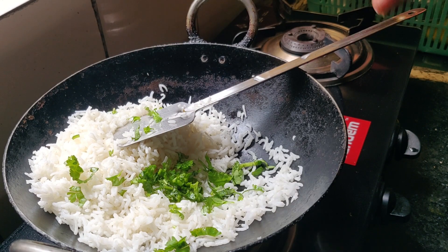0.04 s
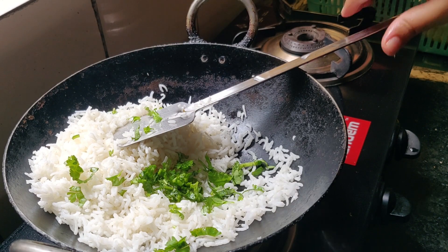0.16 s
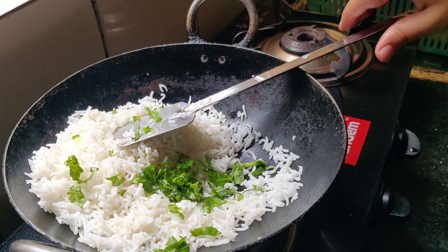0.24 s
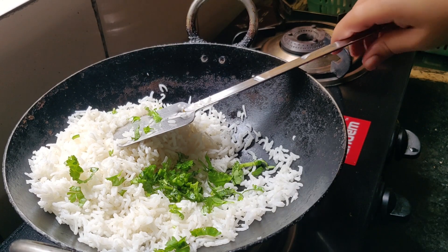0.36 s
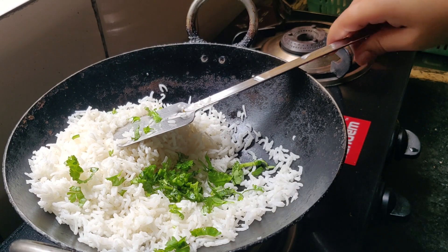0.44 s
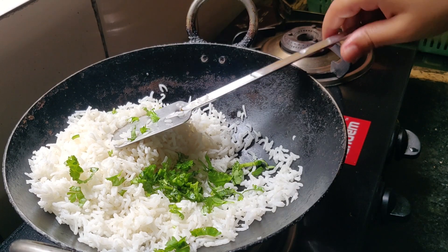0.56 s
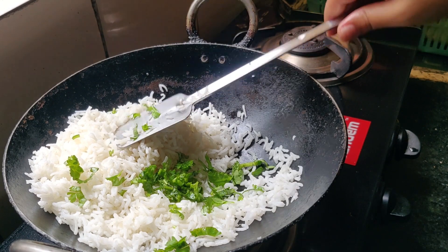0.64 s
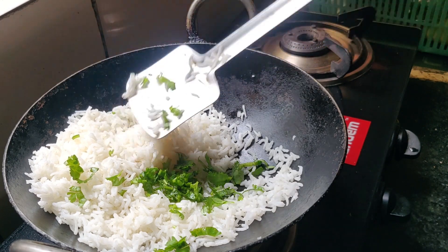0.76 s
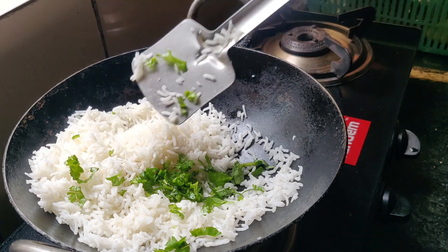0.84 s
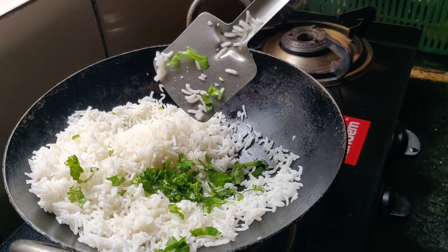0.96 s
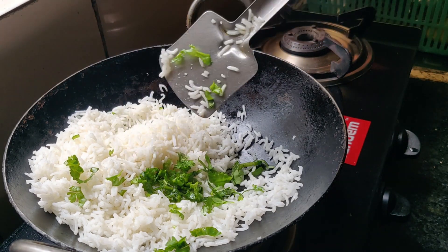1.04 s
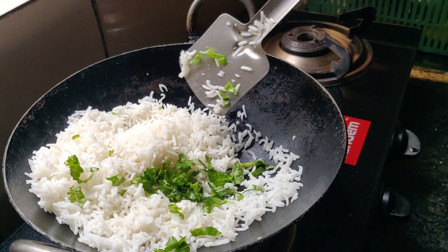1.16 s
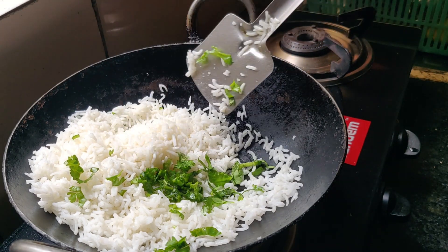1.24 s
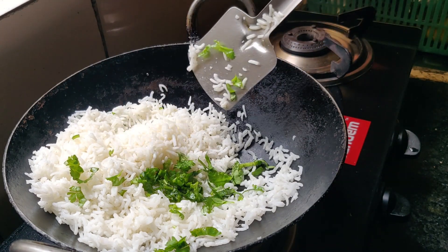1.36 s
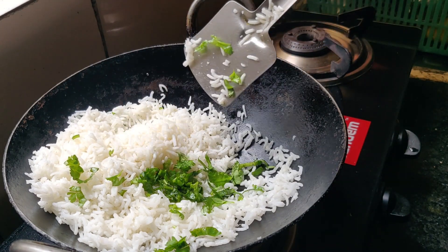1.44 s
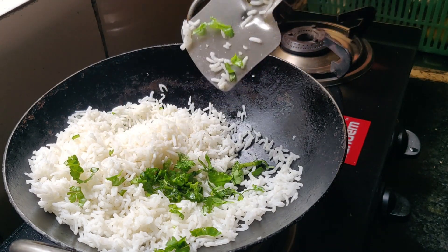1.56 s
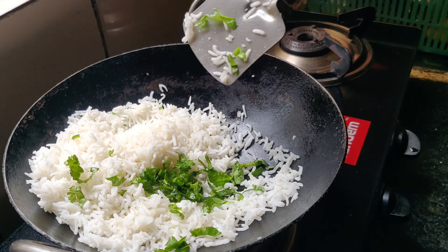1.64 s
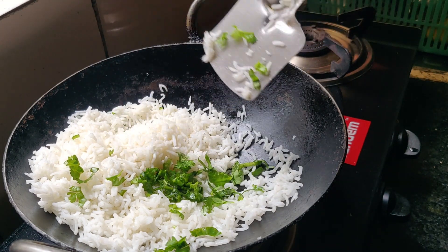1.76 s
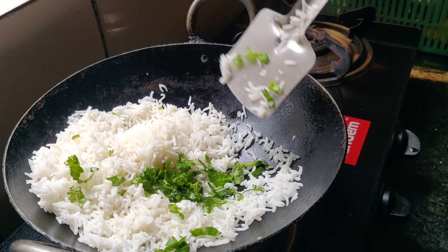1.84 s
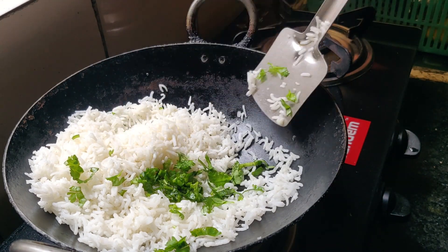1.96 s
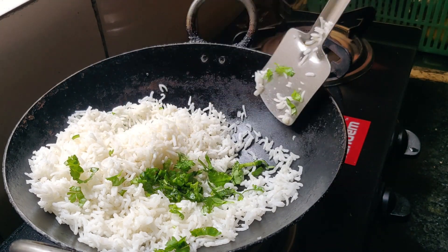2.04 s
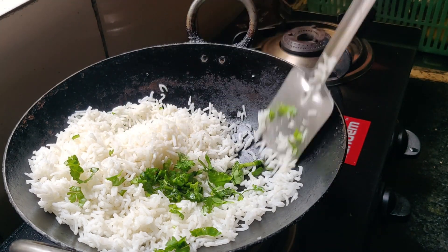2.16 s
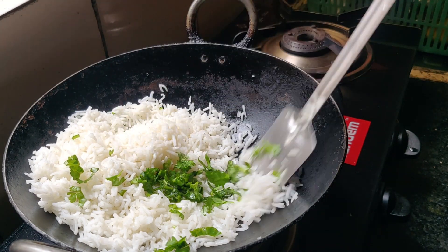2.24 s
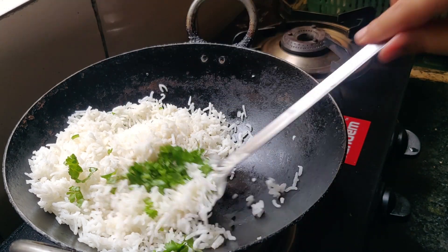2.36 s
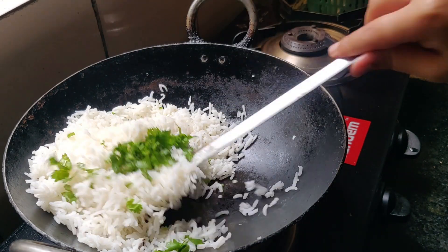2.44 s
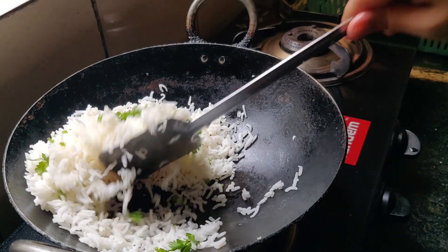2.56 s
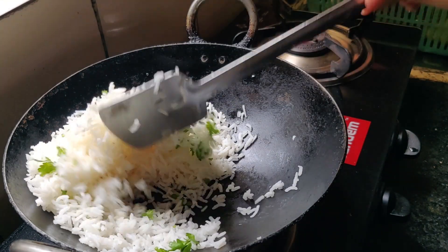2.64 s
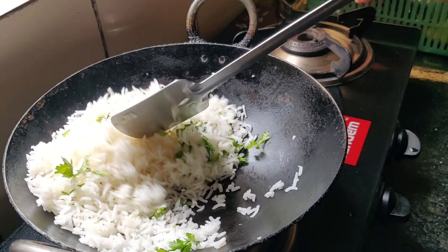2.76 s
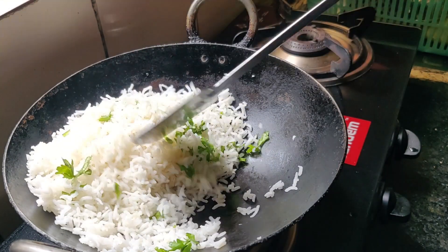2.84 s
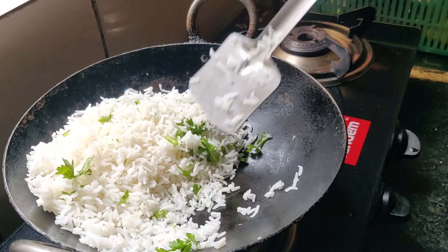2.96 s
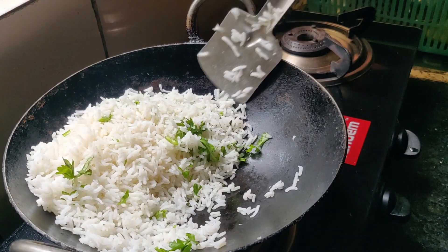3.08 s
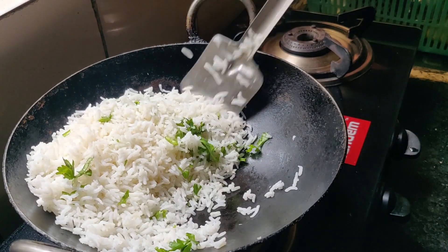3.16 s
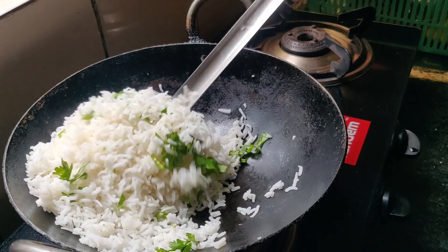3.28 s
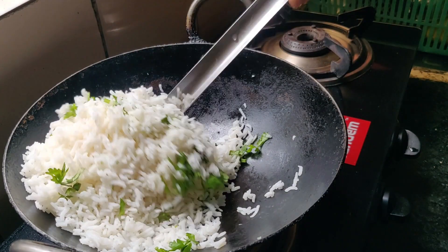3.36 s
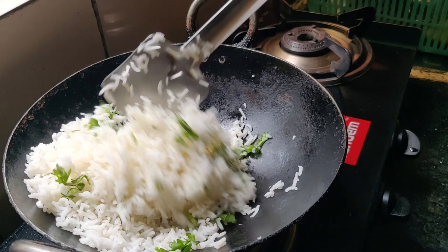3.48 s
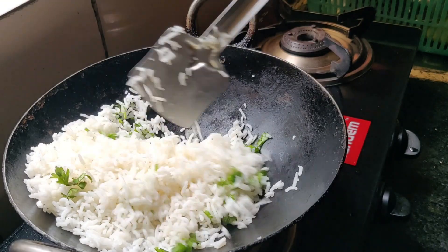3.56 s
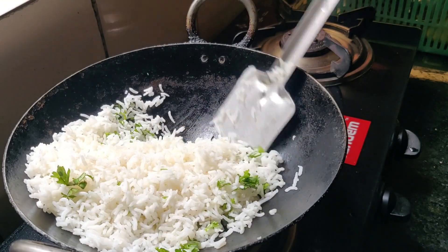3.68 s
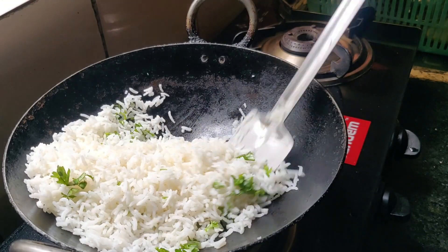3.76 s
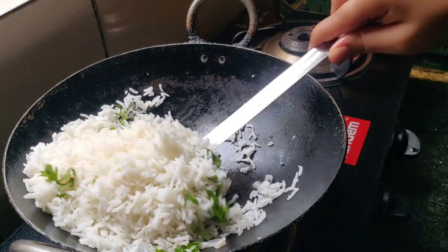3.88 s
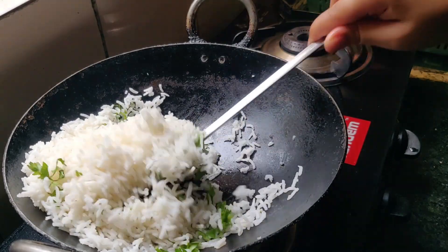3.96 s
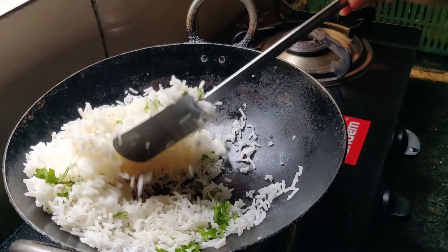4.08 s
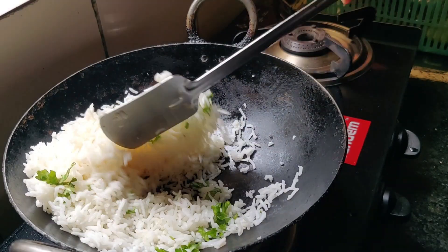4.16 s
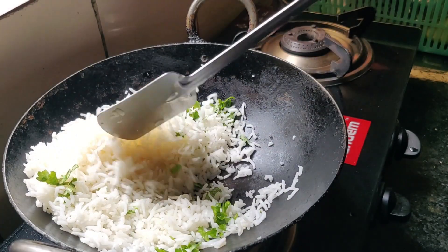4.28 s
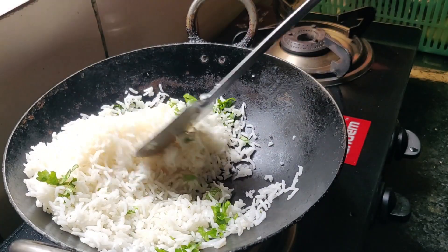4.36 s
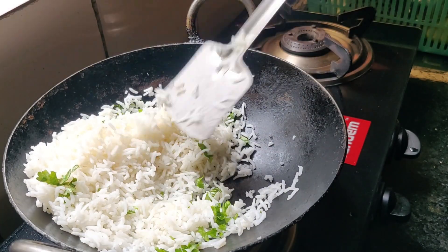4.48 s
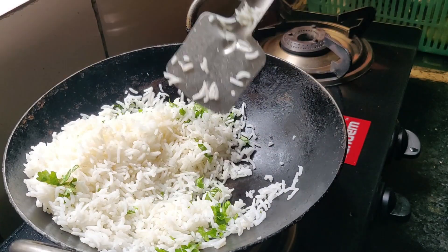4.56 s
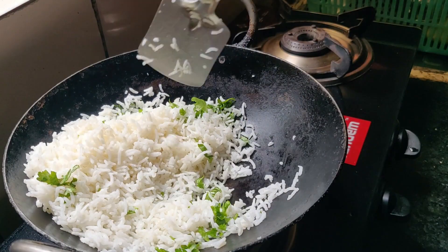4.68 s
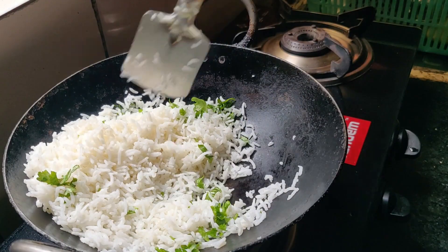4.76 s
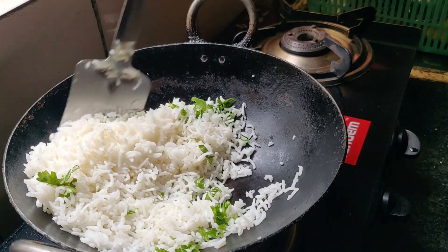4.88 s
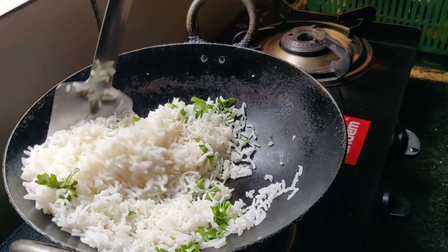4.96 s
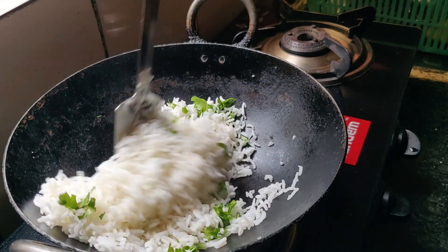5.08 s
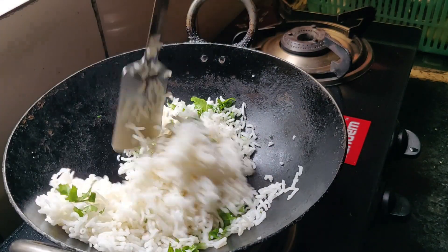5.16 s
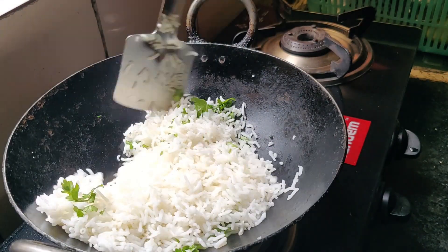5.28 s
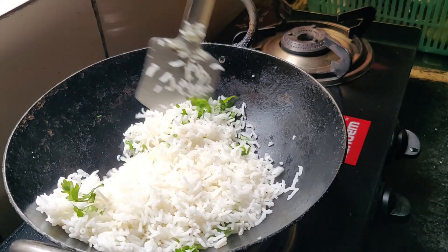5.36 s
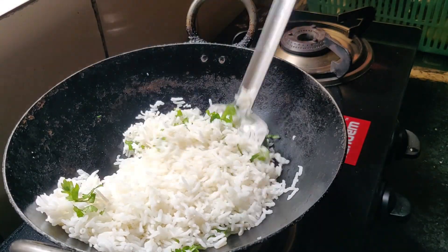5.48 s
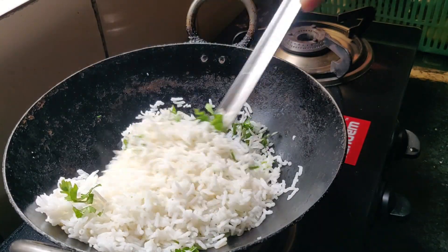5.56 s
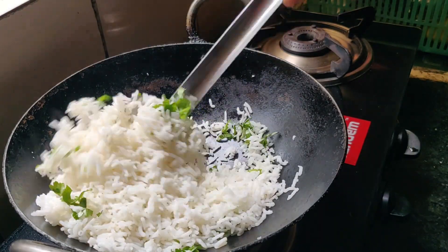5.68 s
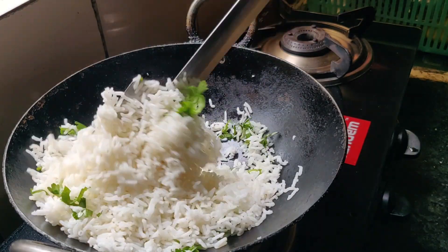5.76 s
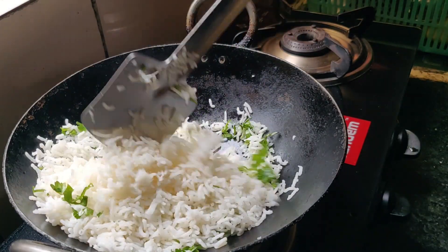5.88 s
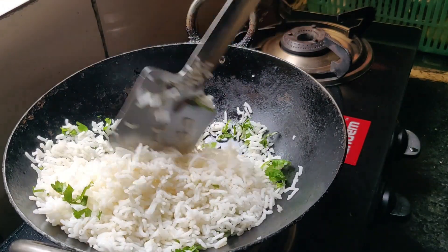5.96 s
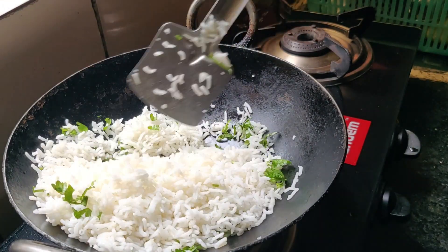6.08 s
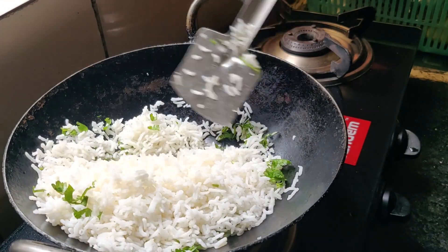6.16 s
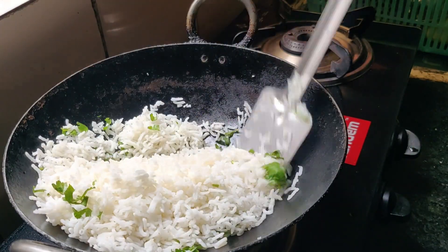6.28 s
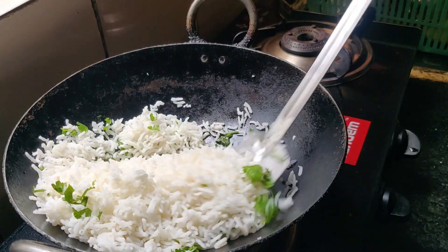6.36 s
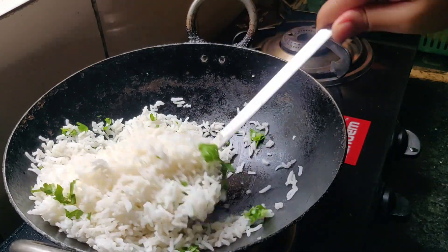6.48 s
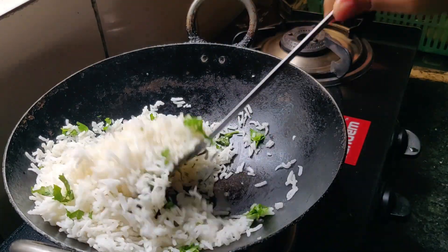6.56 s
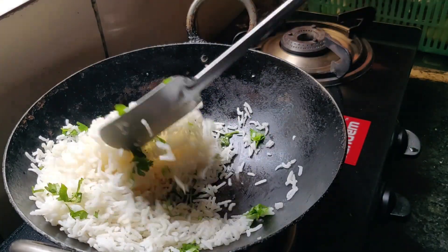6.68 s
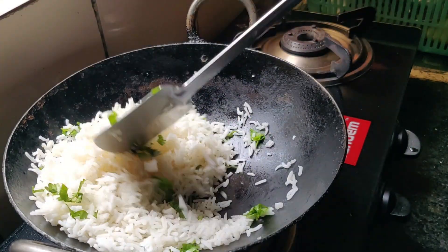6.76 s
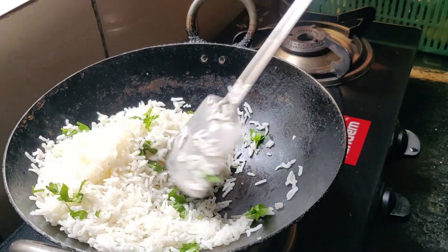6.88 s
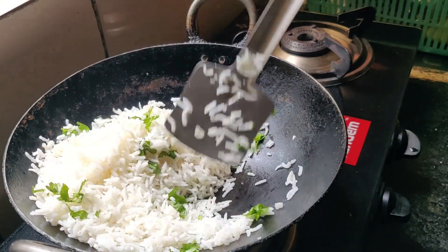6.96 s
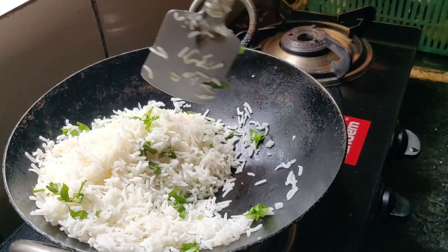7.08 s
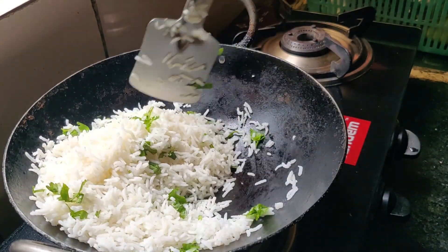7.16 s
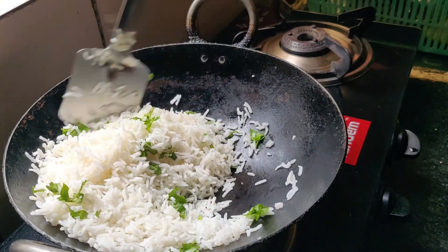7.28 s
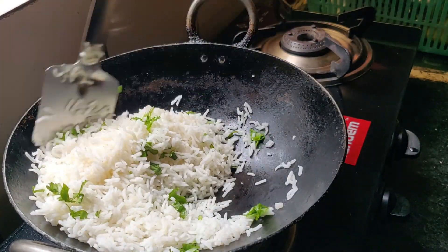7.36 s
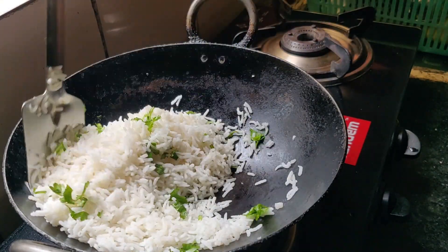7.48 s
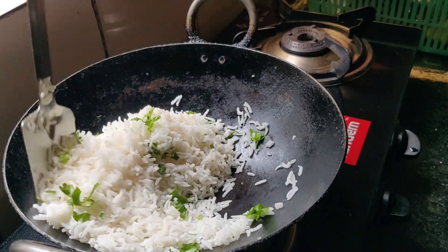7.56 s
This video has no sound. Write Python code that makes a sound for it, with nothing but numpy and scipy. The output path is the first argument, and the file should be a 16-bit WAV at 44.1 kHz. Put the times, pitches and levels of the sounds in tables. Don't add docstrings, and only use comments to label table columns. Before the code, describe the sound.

A flat steel spatula scrapes and tosses cooked rice in a wide iron pan, with sharp metal clacks over a low kitchen hum.

```python
import sys
import numpy as np
from scipy import signal
from scipy.fft import rfft, irfft, next_fast_len
from scipy.io import wavfile
from scipy.ndimage import uniform_filter1d, map_coordinates

SR = 44100
rng = np.random.default_rng(int(sys.argv[2]) if len(sys.argv) > 2 else 0)


def amp(db):
    return 10 ** (np.asarray(db, float) / 20)


def write(x):
    x = np.atleast_2d(x).T
    wavfile.write(sys.argv[1], SR, np.round(np.clip(x, -1, 1) * 32767).astype(np.int16))


N = 336042
T = np.arange(N) / SR


def unit(x):
    return x / np.sqrt(np.mean(x ** 2) + 1e-20)


def along(points, hz):
    f, v = np.transpose(points)
    return np.interp(np.log(hz + 1), np.log(f + 1), v)


def wobble(rate):
    knots = rng.standard_normal(int(N * rate / SR) + 4)
    return map_coordinates(knots, [T * rate])


def coloured(x, spectrum):
    m = next_fast_len(len(x) + 8192)
    gain = amp(along(spectrum, np.fft.rfftfreq(m, 1 / SR)))
    return irfft(rfft(x, m) * gain, m)[:len(x)]


def patchy(x, depth_db, wide, long):
    z = signal.stft(x, nperseg=256)[2]
    field = uniform_filter1d(rng.standard_normal(z.shape), wide, 0)
    field = uniform_filter1d(field, long, 1)
    return signal.istft(z * amp(depth_db * unit(field)), nperseg=256)[1][:N]


def metal(spectrum, t60, count):
    t = np.arange(round(np.clip(1.5 * t60, .01, .3) * SR)) / SR
    draw = rng.random((count, 4))
    heard = [hz for hz, db in spectrum if db > -40]
    hz = heard[0] + (heard[-1] - heard[0]) * (np.arange(count)[:, None] + draw[:, :1]) / count
    life = t60 * (.5 + draw[:, 1:2])
    level = amp(along(spectrum, hz) + 6.7 * draw[:, 3:] - 60 * t / life) / np.sqrt(life)
    modes = level * np.sin(2 * np.pi * (hz * t + draw[:, 2:3]))
    ring = modes.sum(0) * (1 - np.exp(-t / 0.00017))
    return ring / np.linalg.norm(ring)


def add(track, s, sound):
    spot = track[round(s * SR):][:len(sound)]
    spot += sound[:len(spot)]


# time in seconds, level in dB.
HOUSE = [
    (0.0, -56.5),
    (0.15, -55.5),
    (1.55, -59.5),
    (2.46, -55.5),
    (2.67, -59.5),
    (3.18, -56.5),
    (3.46, -58),
    (4.9, -53.5),
    (5.16, -55),
    (7.62, -52.5),
]
# frequency in Hz, level in dB per Hz.
RUMBLE = [(12, -50), (20, -7), (75, -1.5), (102, -1.5), (135, -4), (159, -6.5), (187, -10.5), (225, -20.5),
          (261, -8.5), (420, -17), (504, -15), (584, -22), (701, -19.5), (1600, -34.5), (2080, -58),
          (3520, -120)]
# frequency in Hz, level in dB per Hz.
HISS = [(710, -7.5), (1200, -20.5), (1400, -27), (1750, -3), (2000, -2), (2250, -5), (2980, -7.5),
        (3110, -8), (5410, -11), (6720, -7), (8720, -17), (14000, -15.5), (16000, -14)]


def background():
    strength_db = np.interp(T, *np.transpose(HOUSE))
    rumble = coloured(rng.standard_normal(N), RUMBLE)
    deep = signal.sosfiltfilt(signal.butter(2, 200, fs=SR, output="sos"), rumble)
    hiss = coloured(rng.standard_normal(N), HISS)
    hiss = unit(patchy(hiss, depth_db=1.5, wide=5, long=20))
    deep_db = strength_db + 3
    upper_db = -54 + 0.15 * (strength_db - strength_db.mean())
    low = amp(deep_db) * unit(deep) + amp(upper_db) * unit(rumble - deep)
    return low + amp(-65.5) * hiss


# frequency in Hz, level in dB rms, blur in Hz.
HUM = [(33.96, -63, 4.4), (67.7, -63.5, 5.2), (102.5, -58, 6.8), (131.2, -51, 3.7), (148.7, -63, 2),
       (258.2, -70, 5), (500.5, -62.5, 1.253), (553, -66, 1.45), (607.5, -71, 1.43), (651, -69.5, 1.63),
       (674, -72, 5.1), (841, -73.5, 1.5), (939, -78, 2.1)]


def hum():
    out = 0
    for hz, db, blur in HUM:
        level = amp(db + 2.5 + 1.1 * wobble(blur))
        out = out + level * np.sin(2 * np.pi * hz * T + 0.86 * wobble(blur))
    return out


# frequency in Hz, t60 in seconds.
KITCHEN = [(300, 0.27), (1500, .2), (3000, 0.62), (7000, 0.36), (15000, 0.22)]


def kitchen(x):
    hz, t, z = signal.stft(rng.standard_normal(SR // 2), SR, nperseg=256)
    decay = amp(-60 * t / along(KITCHEN, hz)[:, None])
    tail = signal.istft(z * decay, SR, nperseg=256)[1]
    late = np.pad(x, (200, 0))
    return signal.fftconvolve(late, tail / np.linalg.norm(tail))[:N]


# start in seconds, peak in dB, frequency in Hz, t60 in seconds.
PAN_TONES = [(3.221, -34.5, 120, 0.18), (4.881, -34.5, 107, 0.41), (6.2, -37, 330, 0.07),
             (4.833, -24, 1500, 0.061), (4.836, -37, 1880, 0.43), (4.9, -36, 1520, .08), (4.93, -43, 660, 0.39),
             (5.55, -52.5, 92, 0.18), (6.379, -35.5, 87, 0.21), (7.299, -43, 95, 0.35), (7.36, -51, 660, 0.52),
             (7.3, -45.5, 290, 0.25), (4.85, -45.5, 432, 0.8),
             (4.045, -46, 1720, .1),
    (5.085, -43, 1500, .12),
]
# start in seconds, peak in dB, t60 in seconds.
THUDS = [
    (2.138, -45, 0.15),
    (3.178, -56, 0.052),
    (3.178, -31, 0.3),
    (4.281, -41.5, 0.023),
    (4.832, -34, 0.027),
    (4.842, -30.5, 0.051),
    (6.304, -41, 0.055),
    (6.954, -50, 0.05),
    (7.288, -38, 0.033),
]
# frequency in Hz, level in dB per Hz.
WALL = [(110, -13.5), (200, -1.5), (400, 1), (900, -1), (1300, -13)]


def rocking():
    out, t = np.zeros(N), np.arange(SR // 2) / SR
    for s, db, hz, t60 in PAN_TONES:
        level = amp(db - 60 * t / t60) * (1 - np.exp(-t / 0.0023))
        add(out, s, level * np.sin(2 * np.pi * hz * t))
    for s, db, t60 in THUDS:
        ring = metal(WALL, t60, count=20)
        add(out, s, amp(db) * ring / np.abs(ring).max())
    return out


# frequency in Hz, level in dB per Hz.
BODY = [(530, -52), (900, -8.5), (1200, -5), (1490, 3.5), (1730, -7), (1870, -2), (2100, -3), (2730, -40.5),
        (4620, -120)]
FLEX = [(1800, -16.5), (2100, -9), (2700, -4.5), (3050, -3.5), (3350, -9), (3750, -3), (4200, -11.5),
        (4400, -19)]
BOWL = [(4000, -17.5), (4300, -11), (4700, -12), (5100, -4.5), (5600, -2.5), (6100, -2), (7000, 0),
        (7500, -4), (8200, -10), (8800, -12)]
EDGE = [(4880, -23), (8300, -6.5), (9280, 1.5), (9770, -3), (11000, -3), (11500, -9), (12200, -3.5),
        (13300, -2), (14400, -13), (15100, 3.5), (15700, -3)]


def strike(body_db, edge_db, t60):
    groups = ((BODY, body_db - 7.5, .6), (FLEX, body_db - 6.5, .9), (BOWL, 0, 1.01), (EDGE, edge_db, .8))
    out = np.zeros(SR // 3)
    for spectrum, db, share in groups:
        ring = metal(spectrum, t60 * share, count=70)
        add(out, 0, amp(db) * ring / np.abs(ring).max())
    return out


# start in seconds, peak in dB, body in dB, edge in dB, t60 in seconds.
TOUCHES = [(2.238, -46, 0, 9, 0.024), (2.2773, -39, 0, -9, 0.028), (3.1831, -7.5, -7, -3, 0.017),
           (3.1934, -16, -10, -28, 0.027), (3.257, -21, -11, -17, 0.023), (3.2952, -28, -23, -8, 0.03),
           (3.5538, -38, -7, 3.5, 0.082), (4.845, -13.5, -4, 2, 0.018), (5.4392, -32, 0.5, -13, 0.033),
           (5.473, -17, -11, -17, 0.048), (6.2891, -30.5, 2, -0.5, 0.011), (7.2955, -22.5, -7, -20, 0.046),
           (7.3377, -22, -15, -22.5, 0.03)]
# start in seconds, peak in dB, edge in dB.
TICKS = [(2.69, -50.5, 0), (2.8462, -35, -4), (2.996, -35, -2), (3.064, -38.5, -7), (3.1497, -37, -5),
         (3.6475, -38, -6), (3.684, -42, -1), (3.715, -44, 3), (4.343, -42, 0), (4.4468, -44.5, -21),
         (4.4937, -45.5, -6), (5.169, -51, -4), (5.3693, -41, -2), (5.4154, -54, -21), (5.86, -43, -6),
         (5.9738, -43.5, -5), (6.013, -44, -15), (6.2204, -49, -3), (6.9177, -51, -11)]


def ticks():
    out = np.zeros(N)
    grains = [(s, db, 0, edge_db, 0.015) for s, db, edge_db in TICKS]
    for s, db, body_db, edge_db, t60 in TOUCHES + grains:
        add(out, s, amp(db - 5.0) * strike(body_db, edge_db, np.clip(t60, .004, .15)))
    return out


# start in seconds, peak in dB, body in dB, chatter in seconds, t60 of the ring in seconds.
CLACKS = [
    (2.1401, -27, -2.5, 0.0086, 0.042),
    (3.1752, -14, -3, 0.015, 0.063),
    (3.766, -34.5, -3.5, 0.0069, 0.047),
    (4.8319, -14, -6, 0.021, 0.068),
    (6.3059, -20.5, -14, 0.01, 0.033),
    (6.3692, -20.5, -10.5, 0.011, 0.046),
    (7.2849, -13.5, -16, 0.0095, 0.067),
]
# frequency in Hz, level in dB, t60 in seconds.
RINGS = [
    [(1880, -18, 0.26), (6300, -9, 0.042), (8900, -16, 0.18)],
    [(1488, -9, 0.11), (5303, -20, 0.19), (6410, -1, 0.087), (7100, -2, 0.079), (7600, 3, 0.11),
     (7500, -8, 0.23), (8420, -27, 0.13), (11850, -10.5, 0.2), (15060, 9, 0.058)],
    [(1550, 7, 0.017), (6500, -15, .05)],
    [(6450, -5, 0.12), (10860, -12, 0.11), (11800, -10, 0.0813), (12680, -16, 0.061), (1530, 5, 0.029)],
    [(4760, -7.5, 0.046), (6060, 4.5, 0.028), (6315, 4.5, 0.058), (7500, -11, 0.077), (15050, -1, 0.1),
     (1350, -25, 0.049), (2770, -12, 0.02)],
    [(6830, 7, 0.063), (2810, -6, 0.036), (15090, -14, 0.027)],
    [(6280, 9, 0.037), (7040, -12, 0.11), (8153, 4.5, 0.094), (8570, -3, 0.076), (10780, -13.5, 0.11),
     (12150, -23, 0.061), (1540, -8, 0.023), (1910, -28.5, 0.4)],
]


def clacks():
    out, t = np.zeros(N), np.arange(SR // 2) / SR
    for (s, db, body_db, chatter, t60), modes in zip(CLACKS, RINGS):
        edge_db = np.clip(-5.5 + .5 * (db + 13.5), -11, -5.5)
        bumps = rng.standard_normal(1200) * (rng.random(1200) < .04)
        bumps = bumps * np.exp(-(t[:1200] / chatter) ** 4)
        bumps[0] = 2
        bumps = bumps / np.linalg.norm(bumps)
        ring = 0
        for hz, level, life in modes:
            ring = ring + amp(level - 60 * t / np.clip(life, .02, .36)) * np.sin(2 * np.pi * hz * t)
        ring = ring * (1 - np.exp(-t / .0004))
        crack = rng.standard_normal(400) * amp(-60 * t[:400] / 0.0019)
        add(out, s, amp(db + 2) * signal.fftconvolve(strike(body_db, edge_db, t60), bumps))
        add(out, s, amp(db - 8.5) * signal.fftconvolve(ring, bumps))
        add(out, s, amp(db + edge_db - 11.5) * signal.fftconvolve(np.diff(crack), bumps))
    return out


# full contact in seconds, rise in seconds, hold in seconds, fall in seconds, scrape level in dB.
STROKES = [(2.33, 0.093, 0.1, .2, -30.5), (2.84, 0.2, .01, 0.39, -63.5), (3.14, 0.32, 0.022, 0.038, -51),
           (3.271, 0.038, 0.076, 0.14, -30.5), (3.839, 0.073, 0.09, 0.18, -27.5),
           (4.86, 0.026, 0.016, 0.33, -41.5), (5.022, 0.26, 0.069, 0.11, -47.5),
           (5.37, 0.71, 0.009, 0.18, -66), (5.476, 0.056, 0.18, 0.13, -35),
           (5.586, 0.062, 0.022, 0.056, -35.5), (6.027, 0.75, .15, 0.23, -74),
           (6.449, 0.12, 0.047, 0.17, -28), (7.318, .03, 0.0064, 0.45, -41.5),
           (7.407, 0.027, 0.051, 0.1, -57.5)]
# pan body in dB, blade flex in dB, blade edge in dB,
# deepest bend in seconds after contact, its tone in Hz.
GRIPS = [(-21, -14, -10, .006, 2620), (-19, -20, -5, 0.011, 2600), (-13.5, -10.5, -5.5, 0.011, 2800),
         (-16.5, -10.5, -9.5, 0.074, 2250), (-20.5, -13.5, -8, .045, 2700), (-7.5, -9.5, -7.5, 0.056, 2600),
         (-4, -14.5, -11.5, 0.018, 2600), (4, 0, -6, 0.0093, 2400), (-15, -11, -9, .04, 2800),
         (-17.5, -5.5, -11, .01, 2720), (4, -3.5, 0, .01, 2500), (-22, -12.5, -10.5, 0.012, 2680),
         (-17.5, -17.5, -9, .01, 3000), (-2, -4, -5, .05, 2300)]


def strokes():
    s, rise, hold, fall, loss_db = np.abs(np.transpose(STROKES))[:, :, None]
    body_db, flex_db, edge_db, bend_s, bend_hz = np.transpose(GRIPS)[:, :, None]
    t = T[::64]
    after = np.clip(t - s - hold, 0, None)
    swing_db = 30
    early = swing_db * (np.clip(s - t, 0, None) / rise) ** 1.28
    late = swing_db * (after / fall) ** 0.97
    settle = 66 * after + 19
    high = early + np.minimum(late, settle)
    low = early + np.minimum(late, settle + 4)
    kept = early + (1 - 0.64) * late + 1.5 * np.clip(late - 21.5, 0, None)
    levels = (body_db - kept, flex_db - low, -high, edge_db - high, body_db - 7.5 - kept)
    gains = [np.sqrt(np.sum(amp(level - loss_db) ** 2, axis=0)) for level in levels]
    lead = np.argmax(levels[1] - loss_db, axis=0), np.arange(len(t))
    bow_s, sink_hz_per_s = .05, 3500
    off = t - s - bend_s
    flex_hz = (bend_hz - sink_hz_per_s * np.clip(off, -bow_s, bow_s))[lead]
    bow_db = 13 * np.exp(-(off[lead] / bow_s) ** 2)
    return [np.interp(T, t, curve) for curve in gains + [flex_hz, bow_db]]


def grit(rate, spread_db):
    hit = rng.random(N) < rate / SR
    push = rng.standard_normal(N)
    return unit(hit * push * amp(spread_db * np.minimum(rng.exponential(size=N), 4.5)))


def bent(x, centre_hz, width_hz, lift_db):
    hz, t, z = signal.stft(x, SR, nperseg=512)
    bump = np.exp(-((hz[:, None] - np.interp(t, T, centre_hz)) / width_hz) ** 2)
    return signal.istft(z * amp(np.interp(t, T, lift_db) * bump), SR, nperseg=512)[1][:N]


def scrape():
    *gains, flex_hz, bow_db = strokes()
    force = grit(rate=4000, spread_db=2.5) * amp(1.4 * wobble(40) + 1.2 * wobble(150))
    # spectrum, t60 in seconds, patchiness in dB
    groups = ((BODY, .045, 3.5), (FLEX, .04, 2.2), (BOWL, .055, 2.2), (EDGE, .03, 2.5), (WALL, .05, 3))
    out = np.zeros(N)
    for (spectrum, t60, patchy_db), gain in zip(groups, gains):
        spot = np.pi * wobble(8)
        rung = np.zeros(N)
        for blend in (np.sin, np.cos):
            rung += signal.oaconvolve(force * blend(spot), metal(spectrum, t60, count=100))[:N]
        rung = unit(patchy(rung, depth_db=patchy_db, wide=2, long=10))
        if spectrum is FLEX:
            rung = bent(rung, flex_hz, width_hz=340, lift_db=bow_db)
        out += gain * rung
    return out


def scene():
    hits, stroke = clacks() + ticks(), scrape()
    room = kitchen(amp(-10.5) * hits + amp(-12.5) * stroke)
    return (stroke + hits + room + rocking() + hum() + background())[None]


# frequency in Hz, step in dB.
COARSE = [(1500, -14), (2500, -3), (3300, 2), (4600, 5), (5600, -3), (7400, -3), (8200, 7.5), (15000, 7)]


def starved(x, chance_db, size=1024):
    n, k = np.arange(2 * size), np.arange(size)
    window = np.sin(np.pi * (n + .5) / (2 * size))[:, None]
    basis = window * np.cos(np.pi / size * np.outer(n + .5 + size / 2, k + .5)) * np.sqrt(2 / size)
    blocks = np.pad(x, (size, 2 * size - N % size)).reshape(-1, size)
    lines = np.hstack([blocks[:-1], blocks[1:]]) @ basis
    hz = (k + .5) * SR / (2 * size)
    masking = np.sqrt(np.abs(uniform_filter1d(lines ** 2, size=90, axis=1)) + 1e-20)
    luck = rng.standard_normal((len(lines), size // 8))
    luck = unit(uniform_filter1d(luck, size=4, axis=0))
    step = masking * np.repeat(amp(chance_db * luck), 8, axis=1) * amp(along(COARSE, hz))
    rounded = np.sign(lines) * np.floor(np.abs(lines) / step + .4054) * step * (hz < 15800)
    power = (np.diff(blocks.ravel(), prepend=0) ** 2).reshape(-1, 128).mean(1)
    sudden = power > amp(22) * np.roll(uniform_filter1d(power, size=5), 3)
    sudden = sudden.reshape(len(blocks), -1).any(1)
    attack = (sudden[:-1] | sudden[1:])[:, None]
    frames = np.where(attack, lines * amp(-18 * (hz > 15900)), rounded) @ basis.T
    return (frames[1:, :size] + frames[:-1, size:]).ravel()[:N]


def top_cut(x):
    return signal.sosfilt(signal.butter(12, 16790, fs=SR, output="sos"), x)


def record(dry):
    mix = starved(dry[0], chance_db=4.5)[None]
    return top_cut(mix)


dry = scene()
out = record(dry)
write(out)
```